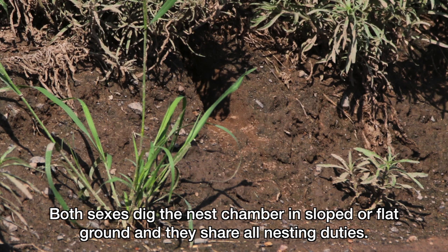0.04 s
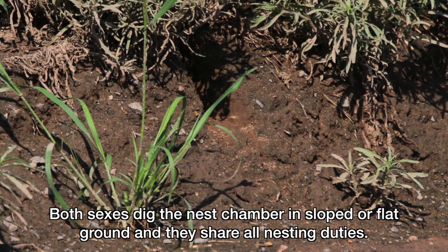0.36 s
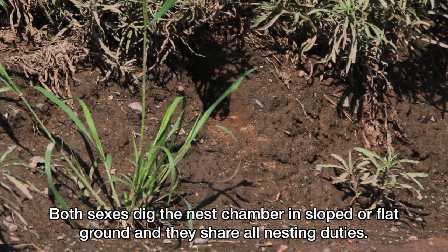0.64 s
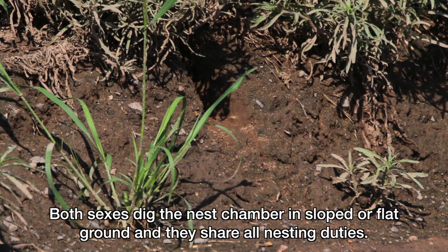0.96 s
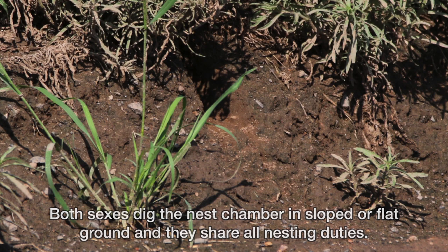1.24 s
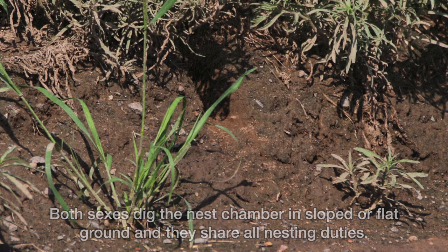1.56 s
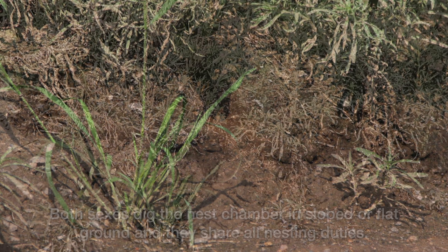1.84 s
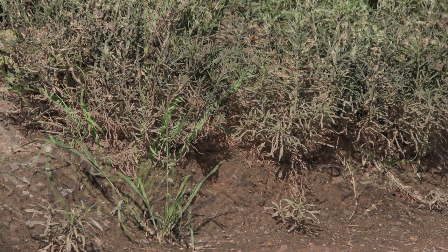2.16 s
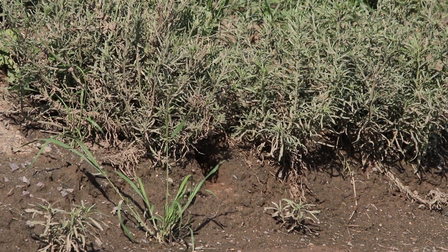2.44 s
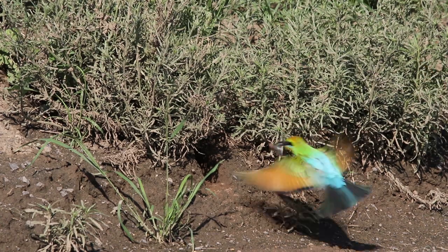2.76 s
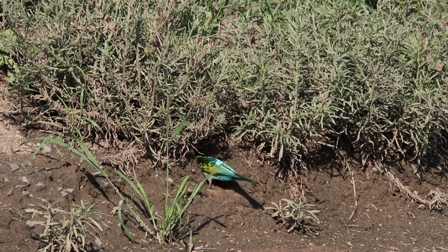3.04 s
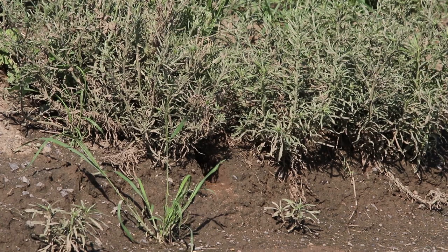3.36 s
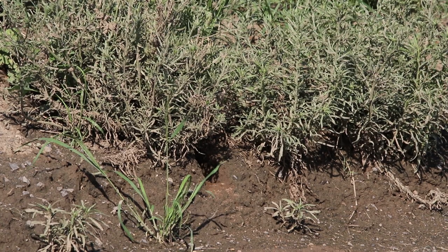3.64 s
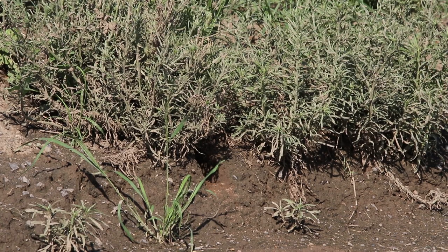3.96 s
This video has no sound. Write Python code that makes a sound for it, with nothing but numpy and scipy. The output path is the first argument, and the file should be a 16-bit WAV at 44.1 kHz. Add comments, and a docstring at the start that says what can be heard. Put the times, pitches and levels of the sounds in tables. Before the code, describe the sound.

Birds give short pips, whistles and rough trills over a soft outdoor hiss.

```python
"""An earth bank with nest holes: bee-eaters call over outdoor hiss, small birds and a faint far hum.
First the air is loud and the birds farther off: arched pips, whistles and rising sweeps echo off the bank.
At 2.1 s it cuts to a quieter ambience: three near trills, a whistle, then muffled calls from the burrow.
Each call is a gliding sine with pitch jitter, plus diffuse reflections; the air is shaped noise."""
import sys
import numpy as np
from scipy import signal
from scipy.fft import rfft, irfft, next_fast_len
from scipy.io import wavfile
from scipy.ndimage import map_coordinates

SR = 44100
rng = np.random.default_rng(int(sys.argv[2]) if len(sys.argv) > 2 else 0)


def persist_wave(psi):
    """Save psi, clipped to +-1, as 16-bit WAV."""
    counts = np.round(np.clip(psi, -1, 1) * 32767).astype(np.int16)
    wavfile.write(sys.argv[1], SR, np.atleast_2d(counts).T)


N = 176400
BANK_T60_S, OPEN_T60_S = 0.032, 0.75
CUT_S = 2.089  # end of the loud ambience


def amp(db):
    return 10 ** (np.asarray(db) / 20)


def curves(rows):
    """One value per sample for each column after the time."""
    time_s, *columns = np.transpose(rows)
    return [np.interp(np.arange(N) / SR, time_s, column) for column in columns]


def wobble(rate_hz, size=N):
    """Smooth random curve, rate_hz knots a second."""
    return map_coordinates(rng.standard_normal(8192), [np.arange(size) * rate_hz / SR], mode="wrap")


def filtered(x, response):
    """Apply a frequency response, given as a function of Hz."""
    size = next_fast_len(N + SR // 2)
    return irfft(rfft(x, size) * response(np.fft.rfftfreq(size, 1 / SR)), size)[:N]


def ramp(u):
    """Quarter-sine rise from 0 to 1."""
    return np.sin(np.pi / 2 * np.clip(u, 0, 1))


def jittered_phase(hz, jitter):
    """Phase of a tone whose pitch shakes by the fraction jitter."""
    return 2 * np.pi * np.cumsum(hz * (1 + jitter * wobble(500, size=len(hz)))) / SR


def add(track, start_s, sound):
    part = track[round(start_s * SR):][:len(sound)]
    part += sound[:len(part)]


def note(length_s, pitches_hz, edge_s, jitter):
    """Progress (0 to 1), envelope and phase of a note bending through its pitches."""
    t = np.arange(int(length_s * SR)) / SR
    progress = t / length_s
    bend = np.polyfit(np.linspace(0, 1, len(pitches_hz)), pitches_hz, len(pitches_hz) - 1)
    envelope = ramp(t / edge_s) * ramp((length_s - t) / edge_s)
    return progress, envelope, jittered_phase(np.polyval(bend, progress), jitter)


def scatter(x, t60_s):
    """Diffuse reflections from earth and bushes: a decaying noise tail."""
    t = np.arange(SR // 2) / SR
    tail = rng.standard_normal(len(t)) * np.exp(-np.log(1000) * t / t60_s) * ramp(t / 0.006)
    tail /= np.linalg.norm(tail)
    early = np.arange(N) / SR < CUT_S  # tails do not cross the cut
    return sum(part * signal.fftconvolve(x * part, tail)[:N] for part in (early, ~early))


def chirps(rows, edge_s, jitter, wet_db, t60_s):
    """Short bending sine notes with reflections."""
    out = np.zeros(N)
    for start_s, length_s, *pitches_hz, level_db in rows:
        _, envelope, phase = note(length_s, pitches_hz, edge_s, jitter)
        add(out, start_s, amp(level_db) * envelope * np.sin(phase))
    return out + amp(wet_db) * scatter(out, t60_s)


def glides(calls, jitter, flutter_db):
    """Fluttering sines that follow pitch and level curves."""
    out = np.zeros(N)
    for call in calls:
        time_s, pitch_hz, level_db = np.transpose(call)
        t = np.arange(time_s[0], time_s[-1], 1 / SR)
        level = amp(np.interp(t, time_s, level_db) + flutter_db * wobble(111.2, size=len(t)))
        gate = ramp((t - time_s[0]) / 0.0022) * ramp((time_s[-1] - t) / 0.0054)
        phase = jittered_phase(np.interp(t, time_s, pitch_hz), jitter)
        add(out, time_s[0], level * gate * np.sin(phase))
    return out


def trills():
    """The near bird chops its tone into three rolls of quick syllables."""
    # start_s, length_s, start_hz, end_hz, level_db, octave_re_fundamental_db
    syllables = [(2.194, 0.012, 2120, 2280, -46, -35), (2.207, .007, 2580, 2400, -30, -49),
                 (2.224, 0.011, 2230, 2460, -33, -42), (2.237, 0.0067, 2530, 2510, -28.5, -50),
                 (2.259, 0.0083, 2160, 2300, -37, -40), (2.2685, 0.0082, 2330, 2370, -32.5, -45.5),
                 (2.5173, .016, 2566, 2390, -29.5, -30.5), (2.532, .019, 2340, 2340, -34.5, -26),
                 (2.5588, .012, 2537, 2385, -30, -28.5), (2.5822, 0.0081, 2540, 2330, -29.5, -27.5),
                 (2.6028, 0.013, 2446, 2185, -34, -25), (2.8393, .018, 2452, 2295, -34.5, -19),
                 (2.853, 0.019, 2305, 2290, -35.5, -24), (2.88, 0.012, 2536, 2394, -29, -35),
                 (2.9045, 0.0051, 2510, 2260, -29, -33), (2.924, 0.013, 2510, 2060, -33, -37)]
    out = np.zeros(N)
    for start_s, length_s, *pitches_hz, level_db, octave_db in syllables:
        _, envelope, phase = note(length_s, pitches_hz, edge_s=0.0043, jitter=0.011)
        overtones = np.sin(2 * phase) + amp(-26) * np.sin(3 * phase) + amp(-24.5) * np.sin(4 * phase)
        add(out, start_s, amp(level_db) * envelope * (np.sin(phase) + amp(octave_db) * overtones))
    return out + amp(-16.5) * scatter(out, t60_s=0.18)


def burrow_calls():
    """Low swelling notes without overtones ring on in the tunnel."""
    # start_s, length_s, start_hz, end_hz, level_db
    calls = [(3.551, 0.023, 1892, 1795, -57), (3.575, 0.026, 2037, 1720, -58),
             (3.68, 0.013, 1650, 1490, -59), (3.769, 0.013, 1980, 1750, -51.5),
             (3.802, 0.023, 1896, 1700, -38.5), (3.928, 0.019, 1917, 1705, -44),
             (3.966, 0.022, 1867, 1720, -35), (3.99, .010, 1710, 1860, -47)]
    tunnel_hz, half_width_hz = 1800, 250
    out = np.zeros(N)
    for start_s, length_s, *pitches_hz, level_db in calls:
        progress, envelope, phase = note(length_s, pitches_hz, edge_s=0.0039, jitter=0.011)
        swell_db = 12.5 * np.minimum(progress - 0.75, 0)
        add(out, start_s, amp(level_db + swell_db) * envelope * np.sin(phase))
    reflections = scatter(out, t60_s=0.17)
    ring = filtered(reflections, lambda hz: 1 / (1 + 1j * (hz - tunnel_hz) / half_width_hz))
    return out + amp(-4.5) * ring


def whistles():
    """Long, nearly level whistles with a quick bank reflection and a faint open-air tail."""
    # one curve per whistle: time_s, pitch_hz, level_db
    calls = [
        [(.575, 4000, -44), (.6, 4080, -54), (.65, 4240, -42.5), (.68, 4236, -55.5), (.71, 4300, -50),
         (.76, 4240, -62)],
        [(.908, 4560, -56), (.93, 4350, -51), (.95, 4210, -42.5), (.97, 4276, -54.5), (.99, 4190, -44),
         (1.02, 4350, -55)],
        [(3.128, 4300, -66), (3.141, 4330, -51.5), (3.185, 4385, -45), (3.212, 4470, -46.5),
         (3.265, 4340, -50.5), (3.325, 4390, -47.5), (3.334, 4130, -48.5), (3.345, 3670, -46)],
    ]
    direct = glides(calls, jitter=0.0038, flutter_db=1.8)
    return direct + amp(-12.5) * scatter(direct, BANK_T60_S) + amp(-13) * scatter(direct, t60_s=0.66)


def sweeps():
    """Rising sweeps whose upper part returns from the bank, partly smeared."""
    # one curve per sweep: time_s, pitch_hz, level_db
    calls = [
        [(.767, 2320, -54), (.78, 2386, -43), (.797, 2420, -43), (.807, 2606, -48.5), (.819, 2930, -37),
         (.831, 3530, -39.5), (.843, 3780, -40), (.853, 4050, -48)],
        [(1.038, 1670, -51), (1.052, 1906, -40), (1.065, 2446, -41), (1.076, 3380, -35.5), (1.088, 3950, -39.5),
         (1.1, 4220, -43.5), (1.118, 5233, -63)],
    ]
    delay_s = 0.054
    direct = glides(calls, jitter=0.015, flutter_db=2.5)
    bright = filtered(direct, lambda hz: ramp((hz - 2200) / 800))
    smeared = bright + amp(1) * scatter(bright, BANK_T60_S)
    echo = filtered(smeared, lambda hz: np.exp(-2j * np.pi * hz * delay_s))
    return direct + amp(-7.5) * echo + amp(-1.5) * scatter(bright, OPEN_T60_S)


def pips():
    """Arched pips and lower after-notes of farther bee-eaters."""
    # start_s, length_s, start_hz, middle_hz, end_hz, level_db
    notes = [(.308, 0.034, 1970, 2350, 1830, -40.5), (1.323, .028, 1980, 2380, 2050, -39.5),
             (1.366, .019, 1960, 2090, 2030, -42), (1.401, 0.024, 1900, 2020, 1930, -45),
             (1.427, 0.029, 1800, 1920, 1740, -47), (1.941, 0.026, 1930, 2350, 2080, -40.5),
             (1.983, .023, 1930, 2010, 1900, -45.5), (2.026, 0.024, 2000, 1700, 1740, -50.5)]
    return chirps(notes, edge_s=0.0088, jitter=0.014, wet_db=-16.5, t60_s=OPEN_T60_S)


def far_notes():
    """Thin pure notes, reverberant with distance."""
    # start_s, length_s, start_hz, middle_hz, end_hz, level_db
    notes = [(.17, .11, 4250, 4380, 4360, -60.5), (.36, 0.077, 2400, 2400, 2380, -60),
             (.69, 0.046, 2900, 3120, 3050, -55.5), (1.39, .07, 4450, 4400, 4490, -56),
             (1.5, .11, 3000, 3050, 3070, -61), (1.715, 0.038, 2800, 2700, 2820, -58),
             (1.72, 0.087, 4480, 4460, 4450, -58.5), (1.772, .025, 3500, 4150, 4400, -54),
             (1.808, 0.026, 5000, 5080, 4850, -48.5), (1.88, .03, 2820, 2750, 2660, -57),
             (1.96, 0.047, 4850, 4900, 4800, -57), (1.61, 0.061, 5150, 5100, 5020, -62),
             (3.055, .025, 4300, 4200, 4280, -64), (3.08, .055, 5380, 5480, 5650, -78),
             (3.13, 0.051, 5970, 6030, 6140, -76), (3.565, 0.055, 2700, 2470, 2480, -66.5)]
    return chirps(notes, edge_s=0.016, jitter=0.009, wet_db=-3.5, t60_s=OPEN_T60_S)


def twitter():
    """Thin, high slurs of small birds."""
    # start_s, length_s, start_hz, middle_hz, end_hz, level_db
    notes = [(.17, 0.071, 3400, 3650, 4880, -58.5), (.325, 0.052, 6500, 7400, 7340, -55),
             (.39, .06, 6600, 7500, 7000, -60.5), (.545, .025, 3100, 3500, 3700, -50.5),
             (.58, .06, 7000, 7000, 6650, -61), (.595, .025, 3000, 3800, 3750, -48),
             (1.115, 0.051, 3200, 6400, 7400, -55), (1.22, 0.047, 8300, 6900, 6850, -58.5),
             (1.38, .055, 7500, 7100, 6640, -58.5), (1.59, .04, 7900, 6600, 6900, -57.5),
             (1.755, 0.044, 7000, 6650, 7460, -57), (2.98, 0.042, 5100, 4380, 4200, -65.5)]
    return chirps(notes, edge_s=0.015, jitter=0.0183, wet_db=-2.5, t60_s=0.22)


def chips():
    """Brief high chips of a small bird."""
    # start_s, length_s, start_hz, end_hz, level_db
    notes = [(2.924, .018, 5520, 5540, -63.5), (2.95, 0.0099, 8400, 8520, -60),
             (3.846, 0.0082, 8150, 8200, -60)]
    return chirps(notes, edge_s=0.0074, jitter=0.006, wet_db=-5, t60_s=0.23)


def air(spectrum, levels):
    """Outdoor hiss drifting slowly in level."""
    freq_hz, density_db = np.transpose(spectrum)
    white = rng.standard_normal(N)
    hiss = filtered(white, lambda hz: amp(np.interp(np.log(hz + 1), np.log(freq_hz + 1), density_db)))
    return hiss / hiss.std() * amp(curves(levels)[0])


def loud_ambience():
    """Loud air with far drones and a narrow high sizzle."""
    # freq_hz, relative_density_db
    spectrum = [(15, -45), (25, -22.5), (79, -2), (156, -3.5), (209, -5), (281, -7.5), (410, -5.5),
                (1270, -11), (2170, -13), (3090, -14), (3440, -17.5), (5010, -21), (5430, -22),
                (7100, -18.5), (8810, -22), (15500, -35.5)]
    # time_s, rms_db
    levels = [(0, -49), (.5, -49), (1.15, -49), (1.7, -50), (2.08, -49.5)]
    return air(spectrum, levels) + far_drones() + narrow_hiss(8610, half_width_hz=310, rms_db=-68.5)


def quiet_ambience():
    """Quiet air with a faint hum and a hollow note."""
    # freq_hz, relative_density_db
    spectrum = [(15, -72), (25, -37), (75, -20), (91, -7), (113, -3), (227, -8.5), (495, -13), (537, -15),
                (598, -11), (648, -14), (703, -11.5), (1340, -13), (1570, -12), (2490, -16.5),
                (4260, -24.5), (5280, -28), (15500, -41.5)]
    # time_s, rms_db
    levels = [(2.15, -69.5), (2.5, -68), (2.8, -66), (3.05, -63.8), (3.25, -62.5), (3.42, -63), (3.58, -64),
              (3.75, -65.5), (4, -66.5)]
    return air(spectrum, levels) + faint_hum() + narrow_hiss(1767, half_width_hz=190, rms_db=-75)


def far_drones():
    """A far engine and a second, higher drone swell and fade."""
    # time_s, pitch_hz, fundamental_db, octave_db
    engine_curve = [(0, 107.3, -63, -66), (.2, 106.4, -52.5, -65), (.32, 107.1, -53, -48.5),
                    (.6, 106.7, -72, -59), (.8, 107.7, -54.5, -52), (.97, 106.9, -59, -58),
                    (1.25, 108, -66, -54), (1.45, 109.5, -61, -49), (1.76, 109.7, -76, -50.5),
                    (1.85, 109, -61, -61), (2.08, 108.4, -66, -63.5)]
    # time_s, pitch_hz, level_db
    drone_curve = [(0, 174, -63.5), (.75, 175, -55), (.92, 175.7, -59.5), (1.25, 176.4, -53.5),
                   (1.42, 178, -62), (1.8, 178, -61), (1.95, 176.3, -49), (2.08, 178, -55)]
    engine_hz, fundamental_db, octave_db = curves(engine_curve)
    drone_hz, drone_db = curves(drone_curve)
    phase = jittered_phase(engine_hz, jitter=0.014)
    engine = amp(fundamental_db) * np.sin(phase) + amp(octave_db) * np.sin(2 * phase)
    return engine + amp(drone_db) * np.sin(jittered_phase(drone_hz, jitter=0.031))


def faint_hum():
    """A low tone and its octave, wavering in pitch and level."""
    pitch_hz, waver_db = 106.3, 3.5
    phase = jittered_phase(np.full(N, pitch_hz), jitter=0.06)
    tone = amp(-75) * np.sin(phase) + amp(-78.5) * np.sin(2 * phase)
    return amp(waver_db * wobble(rate_hz=6.7)) * tone


def narrow_hiss(centre_hz, half_width_hz, rms_db):
    """Steady noise in one resonance."""
    band = filtered(rng.standard_normal(N), lambda hz: 1 / (1 + ((hz - centre_hz) / half_width_hz) ** 2))
    return amp(rms_db) * band / band.std()


def scene():
    """The loud ambience stops and the quiet one comes up; mono on two channels."""
    t = np.arange(N) / SR
    fade_out_s, rise_start_s, rise_s = 0.012, 2.11, 0.036
    loud_gain = ramp((CUT_S - t) / fade_out_s)
    quiet_gain = np.clip((t - rise_start_s) / rise_s, 0.12, 1)
    bird_gain = np.maximum(loud_gain, quiet_gain ** 2)  # dips at the cut
    birds = trills() + burrow_calls() + whistles() + sweeps() + pips()
    birds += far_notes() + twitter() + chips()
    mono = bird_gain * birds + loud_gain * loud_ambience() + quiet_gain * quiet_ambience()
    return np.array([mono, mono])


def record(dry):
    """Brick-wall low-pass."""
    cutoff_hz = 15680
    return np.array([filtered(channel, lambda hz: hz < cutoff_hz) for channel in dry])


dry = scene()
out = record(dry)
persist_wave(out)
```